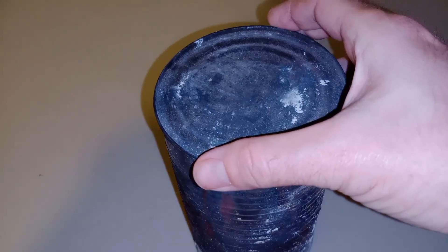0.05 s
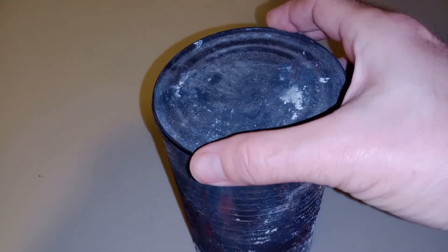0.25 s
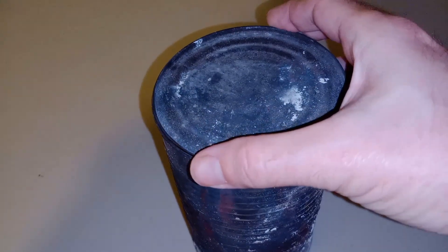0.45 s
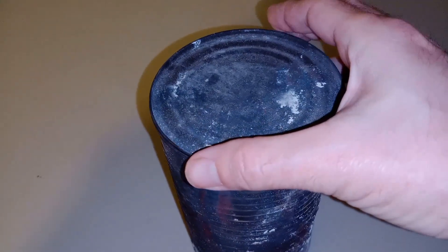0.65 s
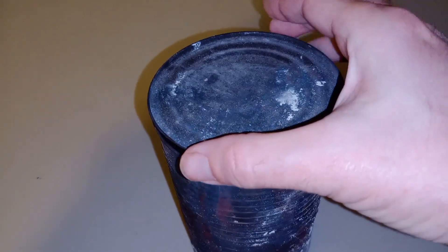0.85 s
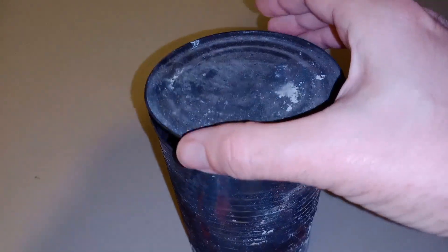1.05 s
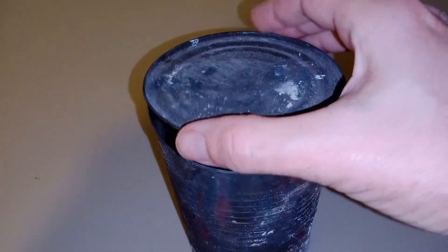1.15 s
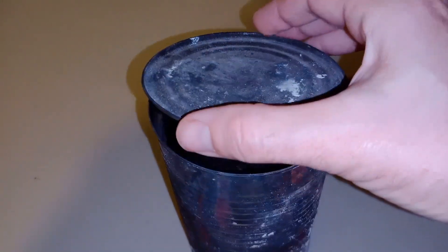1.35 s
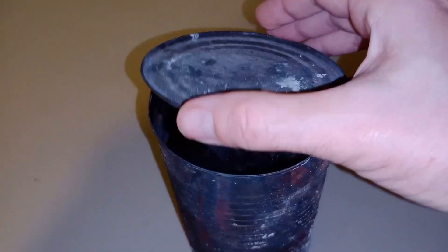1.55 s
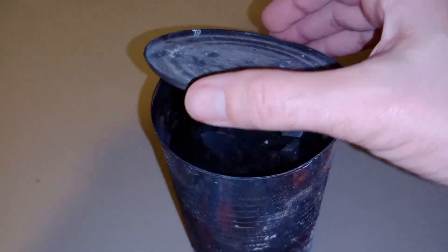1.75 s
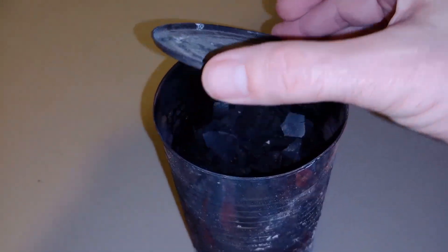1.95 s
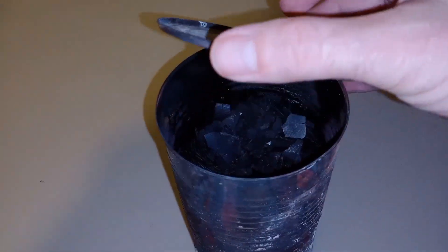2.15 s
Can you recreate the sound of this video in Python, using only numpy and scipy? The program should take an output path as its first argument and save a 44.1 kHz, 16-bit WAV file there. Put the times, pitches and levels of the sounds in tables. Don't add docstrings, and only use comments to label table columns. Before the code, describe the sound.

A hand pries a loose lid off a tin can: faint ticks, a hard hollow clack early on, small scrapes and clicks, then a crisp clink at the end. Close phone microphone, small room, faint high cricket trill.

```python
import sys
import numpy as np
from scipy import signal
from scipy.fft import rfft, irfft
from scipy.io import wavfile
from scipy.ndimage import uniform_filter1d

SR = 44100
rng = np.random.default_rng(int(sys.argv[2]) if len(sys.argv) > 2 else 0)


def undo_db(level):
    steps = np.asarray(level, float) / 20
    return 10 ** steps


def wav_record(signal):
    frames = np.transpose(np.atleast_2d(signal))
    bounded = np.clip(frames, -1, 1)
    quanta = np.round(bounded * 32767).astype(np.int16)
    wavfile.write(sys.argv[1], SR, quanta)


N = 97020
LN_1000 = np.log(1000)


def add(out, start_s, x):
    i = int(start_s * SR)
    out[i:i + len(x)] += x[:N - i]


def band(x, low_hz, high_hz):
    sos = signal.butter(4, [low_hz, min(high_hz, SR / 2.2)], "band", fs=SR, output="sos")
    return signal.sosfilt(sos, x)


def fading(count, rate_hz):
    size = int(SR / rate_hz)
    once = uniform_filter1d(rng.standard_normal((2, count)), size)
    z = uniform_filter1d(once, size)
    return (z[0] + 1j * z[1]) / z.std()


def hand_waver(count, depth):
    return 1 + depth * fading(count, 120)


def coloured_noise(spectrum, level_db, edge):
    hz = np.maximum(np.fft.rfftfreq(N, 1 / SR), 1)
    points = np.array(spectrum)
    gain_db = np.interp(np.log(hz), np.log(points[:, 0]), points[:, 1])
    x = irfft(rfft(rng.standard_normal(N)) * undo_db(gain_db) * edge(hz), N)
    return x * undo_db(level_db) / x.std()


# (frequency [Hz], density [dB per Hz])
AIR_SPECTRUM = [(15, -100), (25, -30), (71, -1.5), (183, -3), (216, -4), (419, -18.5), (544, -18),
                (1220, -33), (7200, -43.5), (9360, -76), (15800, -120)]
# (frequency [Hz], density [dB per Hz])
HISS_SPECTRUM = [(4820, -49), (8200, 5), (9550, 2), (10100, 3.5), (13700, -2), (15100, 12.5), (15900, 4.5)]


def air():
    knee_hz, knee_width_hz = 7900, 150

    def below(hz):
        return 1 / (1 + np.exp(np.clip((hz - knee_hz) / knee_width_hz, -50, 50)))

    def above(hz):
        return (1 - below(hz)) * (hz < 16000)

    return coloured_noise(AIR_SPECTRUM, -53, below) + coloured_noise(HISS_SPECTRUM, -90.5, above)


# (start [s], length [s], level [dB])
WING_STROKES = [
    (0, 0.012, -10),
    (0.012, 0.025, -4.5),
]


def cricket():
    carrier_hz, sag_hz, level_db = 7562, 50, -61.5
    first_s, period_s, chirp_s = .0265, .0555, .040
    scatter_db, echo_width_hz, echo_share, echo_floor = 2.5, 290, .3, .1
    t = np.arange(N) / SR
    chirp = np.floor((t - first_s) / period_s)
    since = t - first_s - chirp * period_s
    scatter = scatter_db * rng.standard_normal((50, 2))
    size_db = scatter[chirp.astype(int) + 1].T
    shape = np.zeros(N)
    for (start_s, length_s, stroke_db), change_db in zip(WING_STROKES, size_db):
        swell = np.sin(np.pi * np.clip((since - start_s) / length_s, 0, 1))
        shape += undo_db(stroke_db + change_db) * swell
    pitch_hz = carrier_hz + sag_hz * (.5 - since / chirp_s)
    tone = np.exp(2j * np.pi * np.cumsum(pitch_hz) / SR)
    echo = fading(N, echo_width_hz)
    return undo_db(level_db) * (tone * (shape * (1 + echo_share * echo) + echo_floor * echo)).real


def pushed_modes(table, waver):
    out, t = np.zeros(N), np.arange(SR // 2) / SR
    for start_s, hz, level_db, push_s, t60_s in table:
        swell = 1 - np.exp(-(t / push_s) ** 2)
        decay = np.exp(-LN_1000 * np.maximum(t - push_s, 0) / t60_s)
        tone = (np.exp(2j * np.pi * hz * t) * hand_waver(len(t), waver)).imag
        add(out, start_s, -undo_db(level_db) * swell * decay * tone)
    return out


# (time [s], frequency [Hz], level [dB], push [s], T60 [s])
KNOCK_EVENTS = [(.2455, 300, -31, .002, .05), (.2671, 238, -17.5, .0045, .022),
                (.2846, 225, -30, .003, .03), (.2972, 245, -34, .003, .08), (.29, 70, -43, .01, .3),
                (.42, 100, -43, .02, .2), (.51, 155, -50, .02, .2), (1.06, 200, -50, .01, .1),
                (.53, 84, -43, .03, .3), (.77, 80, -44, .02, .2), (.88, 110, -48, .015, .15),
                (1.05, 88, -40, .02, .3), (1.095, 88, -35, .015, .2), (1.105, 600, -54, .01, .15),
                (1.07, 150, -46, .015, .2), (.2630, 238, -29, .002, .015), (.275, 150, -40, .008, .1),
                (1.28, 150, -50, .015, .2), (1.235, 88, -39, .01, .3), (1.888, 404, -44, .004, .1),
                (1.885, 120, -46, .006, .1)]


def knocks():
    return pushed_modes(KNOCK_EVENTS, 0)


# (time [s], frequency [Hz], level [dB], push [s], T60 [s])
PING_EVENTS = [(.066, 2670, -64, 0.0015, 0.054), (.180, 1074, -62.5, 0.0071, 0.5),
               (.228, 1090, -50.5, 0.0018, 0.069), (.241, 1084, -46, 0.0012, 0.039),
               (.246, 886, -35, 0.0051, 0.042), (.255, 988, -41, 0.0018, 0.04),
               (.260, 2405, -32, 0.0024, 0.0085), (.548, 11400, -75.5, 0.0024, 0.044),
               (.774, 1310, -53, .002, 0.016), (.774, 2580, -55.5, 0.0016, 0.02),
               (.780, 3080, -60, 0.0027, 0.056), (.868, 3210, -61, 0.0054, 0.04),
               (.868, 11860, -72, 0.0018, 0.03), (.889, 5960, -54.5, 0.0066, 0.066),
               (.889, 9350, -64.5, 0.0035, 0.081), (1.0935, 5790, -39.5, 0.00095, 0.011),
               (1.2095, 5860, -40, 0.0023, 0.015), (1.210, 4640, -48.5, 0.00092, 0.033),
               (1.657, 11600, -63.5, 0.0017, 0.031), (1.887, 1118, -41, 0.0028, 0.034),
               (1.888, 2200, -45.5, 0.0037, 0.028), (1.888, 3160, -40, 0.0012, 0.018),
               (1.8865, 3990, -42, 0.0014, 0.022), (1.888, 5790, -40, 0.0017, 0.018),
               (1.888, 7540, -45.5, .002, 0.038), (1.887, 9360, -57.5, .003, .04),
               (1.888, 1620, -45.5, 0.0015, 0.026), (1.888, 4570, -48.5, 0.0017, 0.017),
               (.25, 5717, -43, 0.0061, 0.054), (.295, 4081, -52.5, .006, 0.079),
               (0.33, 4860, -67, 0.0071, 0.066), (0.31, 5600, -59, .005, 0.064),
               (.517, 6300, -68, 0.0069, .2), (0.54, 5300, -66, 0.0094, 0.18),
               (0.7, 5700, -69.5, .008, .12), (.886, 3300, -54.5, 0.0027, 0.036),
               (1.093, 11800, -63, .002, .03), (1.097, 2840, -61.5, 0.0041, 0.098),
               (1.112, 5800, -56, .004, .05), (1.115, 4860, -59, .006, 0.09),
               (1.112, 9200, -63.5, 0.0036, 0.081), (1.21, 6870, -49, .002, 0.025),
               (1.209, 2900, -63, 0.0014, 0.023), (1.21, 9120, -52.5, .002, 0.017),
               (1.244, 3600, -61, 0.0031, 0.035), (1.248, 5940, -60, .003, .04),
               (1.657, 5400, -64, 0.0027, 0.046), (1.662, 4700, -66, .004, 0.044),
               (.229, 5700, -63, 0.0026, .04), (.262, 3000, -50, .004, 0.035),
               (.259, 4090, -40, 0.0018, 0.034), (0.28, 5975, -66.5, 0.007, 0.077),
               (1.895, 5940, -52, .003, 0.079), (.069, 4400, -68, .004, .05),
               (1.665, 1650, -66, 0.0054, .08), (1.668, 2370, -70, 0.0072, 0.069),
               (1, 2280, -66.5, .008, 0.11)]


def tin_pings():
    return pushed_modes(PING_EVENTS, .18)


def struck_mode(x, hz, t60_s):
    pole = np.exp(2j * np.pi * hz / SR - LN_1000 / (t60_s * SR))
    return (signal.lfilter([1], [1, -pole], x) * hand_waver(len(x), .5)).imag


def rattle_clicks(shape):
    clicks_per_s, spread_db = 10000, 2.0
    u = rng.random((2, len(shape)))
    clicks = (u[0] < clicks_per_s / SR) * np.sign(u[1] - .5)
    sizes = undo_db(spread_db * rng.exponential(size=len(shape)))
    rattle = shape * (clicks * sizes + 0.87 * (u[1] - .5))
    return rattle / np.sqrt(np.sum(rattle ** 2))


# (frequency [Hz], level [dB], T60 [s])
LID_MODES = [(1100, -9, 0.016), (1430, -7, 0.0067), (1506, -20.5, 0.038), (1558, -19.5, 0.038),
             (1894, -18, 0.052), (2200, -13.5, 0.013)]
# (frequency [Hz], level [dB], T60 [s])
WALL_MODES = [(2290, -20, .05), (2420, -20, .05), (2724, -19, .05), (2950, -17, .06), (3280, -13, .05),
              (3760, -15, .05), (4081, -17, .07), (4580, -15, .03), (4860, -18, .07), (5590, -10, .03),
              (5717, -13, .06), (5940, -12, .07), (6449, -20, .04), (6930, -16, .04)]
# (frequency [Hz], level [dB], T60 [s])
RIM_MODES = [(7500, -4, 0.013), (8350, -21, 0.028), (9350, -7, 0.023), (9840, -19, 0.034),
             (11000, -12, .02), (11860, -10, 0.02)]
# (low edge [Hz], high edge [Hz], level [dB])
SCRAPE_BANDS = [(1400, 3200, 9), (2500, 7000, 20), (8200, 14300, 7)]


def slip(length_s, parts_db):
    grip_db, grip_detune = 1.2, .006
    t = np.arange(SR // 8) / SR
    shape = (1 - np.exp(-(t / length_s / .3) ** 2)) * np.exp(-(t / length_s) ** 2)

    noise = rng.standard_normal(len(t)) * shape / np.sqrt(np.sum(shape ** 2))
    _, wall_db, rim_db = parts_db
    out = undo_db(wall_db / 4 + rim_db * 3 / 4 + 28) * band(noise, 14400, 15800)

    parts = zip((LID_MODES, WALL_MODES, RIM_MODES), parts_db, SCRAPE_BANDS)
    for modes, part_db, (low_hz, high_hz, scrape_db) in parts:
        rattle = rattle_clicks(shape)
        grip = rng.standard_normal((14, 2))
        tone = np.zeros(len(t))
        for (hz, mode_db, t60_s), (louder, sharper) in zip(modes, grip):
            mode = struck_mode(rattle, hz * (1 + grip_detune * sharper), t60_s)
            tone += undo_db(mode_db + grip_db * louder) * mode
        scrape = undo_db(scrape_db) * band(rattle, low_hz, high_hz)
        out += undo_db(part_db) * (band(tone, 1000, 16000) + scrape)
    return out


# (time [s], length [s], lid level [dB], wall level [dB], rim level
# [dB])
RIM_SLIPS = [(0.067, 0.02, -55, -68, -93), (0.178, 0.034, -59, -63.5, -95), (0.228, 0.017, -58, -55.5, -88),
             (0.2432, 0.011, -39, -41, -73), (0.251, 0.014, -38.5, -39.5, -66),
             (0.259, 0.0077, -30.5, -40, -52.5), (0.266, 0.02, -40, -45.5, -59),
             (0.282, 0.013, -53, -48, -72), (.297, .016, -52, -60, -84), (0.516, 0.013, -80, -65.5, -76),
             (0.542, 0.012, -60, -59.5, -83), (0.628, 0.036, -57.5, -60.5, -82),
             (0.772, 0.011, -55, -57.5, -95), (0.788, 0.022, -55, -60, -93), (0.867, 0.015, -62, -59, -66),
             (0.8827, 0.011, -57, -60, -63), (0.893, 0.012, -53, -58.5, -69),
             (1.078, .014, -77, -61, -73), (1.093, 0.0032, -64, -57, -62), (1.098, 0.023, -64, -52, -58),
              (1.108, 0.015, -72, -59, -58), (1.192, 0.015, -76, -58.5, -76),
              (1.206, 0.011, -77, -44.5, -55.5), (1.211, 0.008, -57, -77, -86),
              (1.226, 0.016, -51.5, -52.5, -64.5), (1.241, 0.016, -58, -52.5, -57),
              (1.574, 0.039, -62, -64, -69), (1.655, 0.0067, -58, -59.5, -71),
              (1.662, 0.01, -58, -62.5, -74), (1.676, 0.017, -58, -63, -80), (1.711, 0.016, -57, -68, -79),
              (1.812, 0.0034, -76, -76, -80), (1.886, .003, -55, -53, -67), (1.8878, 0.0054, -33, -45, -62),
              (1.9, 0.036, -60, -61.5, -80)]


def can():
    out = np.zeros(N)
    for start_s, length_s, *parts_db in RIM_SLIPS:
        add(out, start_s, slip(length_s, parts_db))
    return out


def room_tail(x):
    t60_s, gap_s = 0.13, .004
    t = np.arange(SR // 3) / SR
    tail = rng.standard_normal(len(t)) * np.exp(-LN_1000 * t / t60_s) * (t > gap_s)
    return signal.fftconvolve(x, tail / np.sqrt(np.sum(tail ** 2)))[:N]


def scene():
    background = air() + cricket() + knocks()
    metal = can() + tin_pings()
    return (background + metal + undo_db(-10.5) * room_tail(metal))[None]


def top_cut(x):
    return signal.sosfilt(signal.butter(12, 16400, fs=SR, output="sos"), x)


def record(dry):
    low_pass = signal.ellip(8, .2, 50, 16000, fs=SR, output="sos")
    mix = signal.sosfilt(low_pass, dry)
    return top_cut(mix)


dry = scene()
out = record(dry)
wav_record(out)
```